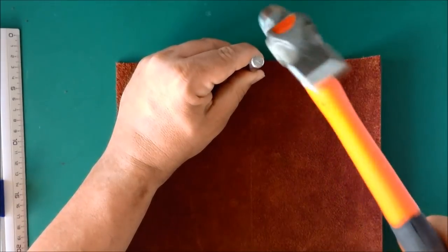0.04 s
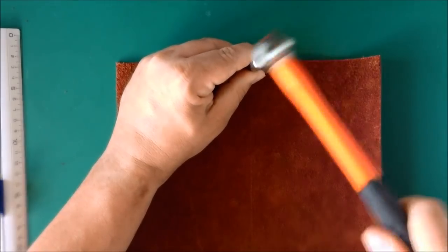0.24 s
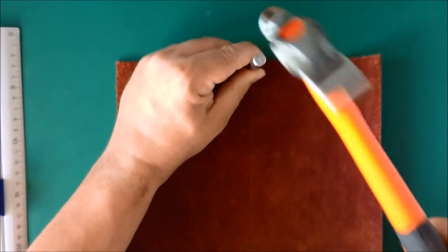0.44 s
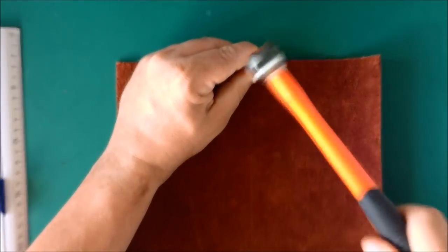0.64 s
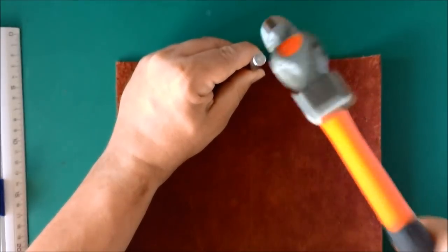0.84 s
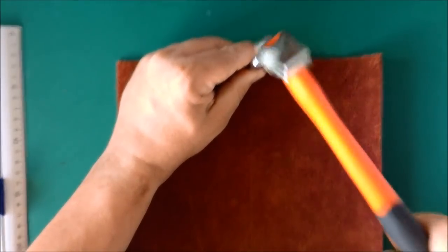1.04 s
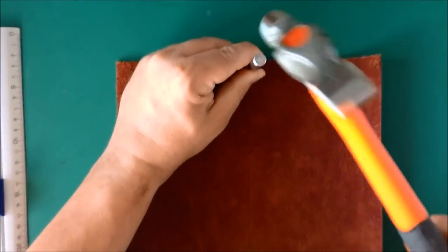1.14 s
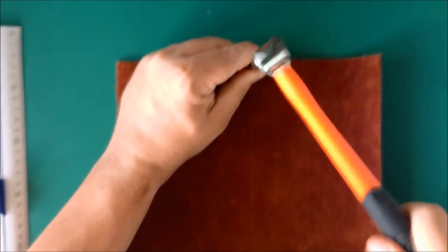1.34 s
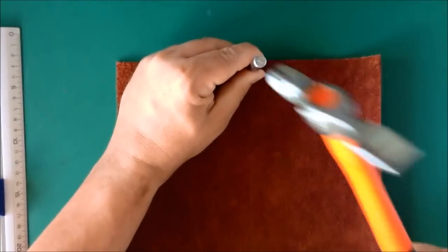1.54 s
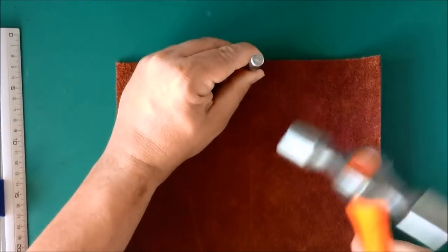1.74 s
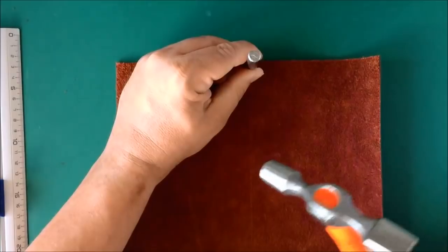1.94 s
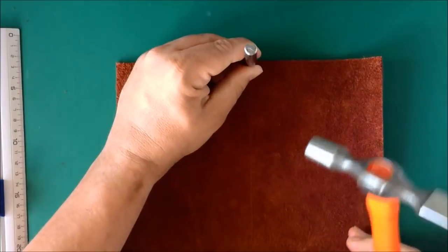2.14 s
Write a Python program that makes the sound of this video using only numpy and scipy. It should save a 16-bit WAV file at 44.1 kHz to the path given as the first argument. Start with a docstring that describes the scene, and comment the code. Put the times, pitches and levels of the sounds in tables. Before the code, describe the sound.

A hammer hits a small steel punch through leather on a workbench, four sharp clacks evenly spaced, each with a low bench thud and faint settling knocks, close microphone in a small room with quiet hiss.

```python
"""In a small room, a hammer drives a small steel hollow punch through leather on a workbench: four even blows.
Each blow is three contacts (touch, full impact, rebound) exciting steel modes, with a gritty crack of noise.
Beneath it the bench top rings as a sum of decaying sines. Noise tails form the room's diffuse decay, the bench
shudder and the lingering tones. Faint soft knocks follow as the tools settle, over quiet hiss and low noise."""
import sys
import numpy as np
from scipy import signal
from scipy.fft import rfft, irfft
from scipy.io import wavfile

SR = 44100
rng = np.random.default_rng(int(sys.argv[2]) if len(sys.argv) > 2 else 0)


def to_wav(s):
    """Save 16-bit WAV."""
    ch = np.atleast_2d(s).T  # columns
    pcm = np.round(np.clip(ch, -1, 1) * 32767)  # PCM
    wavfile.write(sys.argv[1], SR, pcm.astype(np.int16))


N = 97064
TIME = np.arange(N) / SR
FREQS = np.maximum(np.fft.rfftfreq(N, 1 / SR), 1)

# Noise spectra set only relative levels over frequency, since every noise is scaled to rms 1.
# Treble hiss spectrum. Each row: frequency in Hz, relative density in dB per Hz.
HISS_SPECTRUM = [(200, -29), (600, -11), (900, -2), (1300, 2.5), (1800, -2.5), (3000, 0), (4400, -1),
                 (5500, -8.5), (9000, -12.5), (15000, -14.5)]
# Drift of the hiss. Each row: time in seconds, level in dB.
HISS_DRIFT = [(0, -63.5), (.17, -72), (.3, -65.5), (.6, -71.5), (.95, -71.5), (1.3, -73.5), (1.5, -68),
              (1.72, -67.5), (1.92, -70), (2.2, -66)]
# Low room noise spectrum. Each row: frequency in Hz, relative density in dB per Hz.
LOW_SPECTRUM = [(30, -33), (100, -17.5), (190, 1), (300, -3.5), (380, -1), (460, 4.5), (540, -7.5),
                (800, -10.5), (1500, -29)]
# Drift of the low noise. Each row: time in seconds, level in dB.
LOW_DRIFT = [(0, -59.5), (.17, -71.5), (0.282, -58.5), (.62, -67), (.98, -66), (1.299, -66.5), (1.698, -72),
             (1.919, -71.5), (2.2, -67.5)]

# Hammer blows. Each row: touch time in seconds, steel in dB, bench in dB, extra for upper bench modes in dB,
# thump in dB, touch to impact in seconds, touch to rebound in seconds, crack in dB.
HAMMER_BLOWS = [(.3284, 0.5, 0.5, -14.5, -24.5, .0017, 0.0036, -8.5),
                (0.6947, -2.5, 3, 1.9, -36, 0.0015, 0.0031, -7.5),
                (1.0299, -1.5, 2, 1.16, -30.5, .0013, .0034, -7),
                (1.3663, 2, 4, 2.8, -28.5, .0012, .0037, -8)]
# Modes of hammer and punch. Each row: frequency in Hz, level in dB, t60 in seconds.
STEEL_MODES = [(1265.4, -26, 0.053), (1350, -27, 0.039), (1956, -19, 0.032), (2288, -24, 0.068),
               (2712, -19, .025), (3098, -16, .022), (3664, -18, 0.02), (4513, -21, 0.024),
               (5264, -9.5, 0.0085), (6540, -16.5, 0.016), (8160, -17, 0.0055), (9100, -21, 0.01),
               (10750, -24.5, .008), (12080, -26, 0.015), (14500, -31, .007)]
TOUCH_DB, REBOUND_DB = -8.5, -19.5  # relative to the full impact
# Gritty crack of the contact. Each row: frequency in Hz, relative density in dB per Hz.
CRACK_SPECTRUM = [(500, -11), (1200, 3.5), (2800, 4), (5000, -3), (7500, -10.5), (11000, -13),
                  (15000, -22.5)]
CRACK_RISE_S, CRACK_T60_S = 0.00078, 0.017

# Modes of the bench top. Each row: frequency in Hz, level in dB, t60 in seconds.
BENCH_MODES = [(129.4, -32.5, .2), (181, -16, .076), (213.7, -14, .144), (266, 1, .034), (327.7, -14, .142),
               (389.8, -5.5, .075), (471, -21, 0.12), (546.1, -11, .096), (644.8, -12, .071),
               (696.5, -14.5, .069), (740, -16, 0.067), (824.5, -11.5, 0.035)]
UPPER_BENCH_HZ, BENCH_RISE_S = 600, 0.0066
BENCH_LEAD_S = 0.0042  # bench and thump begin this long before the touch
THUMP_HZ, THUMP_T60_S = 45, 0.044
# Shudder of the bench after a blow. Each row: frequency in Hz, relative density in dB per Hz.
SHUDDER_SPECTRUM = [(60, -34.5), (170, -7.5), (300, 0.5), (520, 1.5), (720, -2.5), (950, -8.5), (1400, -16),
                    (3000, -39.5)]
SHUDDER_DB = -9.5  # relative to the bench level of the blow
SHUDDER_RISE_S, SHUDDER_T60_S = 0.0076, 0.07

# Clack returning from all round. Each row: frequency in Hz, relative density in dB per Hz.
WASH_SPECTRUM = [(40, -26), (100, -12.5), (300, 5), (950, 7), (1500, 3.5), (2200, 0.5), (3200, -1),
                 (5000, -5.5), (7000, -17), (10000, -18.5), (15000, -27.5)]
WASH_DB, WASH_T60_S = -24, 0.22  # level relative to the steel of the blow
# Steel tone lingering after each blow, in order. Each row: centre in Hz, width in Hz, level in dB.
LINGER_TONES = [(2880, 620, -31.5), (4370, 190, -36.5), (4300, 900, -38.5), (5470, 370, -39)]
LINGER_T60_S = 0.25
# low after-rumble of the bench frame
RUMBLE_HZ, RUMBLE_WIDTH_HZ, RUMBLE_DB, RUMBLE_T60_S = 213, 220, -45, 0.64

# Soft knocks as the tools settle. Each row: time in seconds, level in dB.
SETTLING_KNOCKS = [(.399, -27.5), (0.454, -36.5), (.515, -36.5), (.553, -50.5), (.881, -33), (.922, -51.5),
                   (1.217, -37.5), (1.259, -47.5), (1.556, -42.5), (1.595, -45.5)]
# Dull tap of a knock. Each row: frequency in Hz, relative density in dB per Hz.
TAP_SPECTRUM = [(100, -13.5), (300, 1.5), (850, -1), (1300, -16), (2500, -37)]
TAP_DB, TAP_T60_S = -10.5, 0.027  # level relative to the knock
KNOCK_RISE_S, KNOCK_BENCH_DB = 0.001, -8.5  # bench part, relative to the knock

# Share of the sound that the room returns. Each row: frequency in Hz, gain in dB.
ROOM_GAIN = [(50, -19.5), (130, -10.5), (250, -10), (450, -14.5), (700, -14.5), (1100, -10), (2000, -12),
             (3200, -12), (5000, -14.5), (7000, -15.5), (10000, -14.5), (15000, -15.5)]
# Ring time of the room. Each row: band centre in Hz, t60 in seconds.
ROOM_DECAY = [(100, 0.22), (250, 0.2), (700, .2), (2000, 0.26), (4500, 0.25), (8000, 0.17), (14000, 0.053)]
ROOM_RISE_S = 0.0076
CLIP_TOP, CUTOFF_HZ = 1.25, 15300


def from_db(db):
    """Level law: decibels to amplitude gain."""
    return 10 ** (np.asarray(db) / 20)


def at_hz(points, hz):
    """Logarithmic pitch: read a table on a log-frequency axis."""
    f, v = np.transpose(points)
    return np.interp(np.log(hz), np.log(f), v)


def since(s):
    """Causality: seconds gone by since s, zero before."""
    return np.maximum(TIME - s, 0)


def dying(t, t60):
    """Exponential damping: a loss of 60 dB in t60."""
    return np.exp(-np.log(1000) * t / t60)


def rising(t, rise):
    """Exponential build-up: a rounded attack with time constant rise."""
    return 1 - np.exp(-t / max(rise, 1e-5))


def noise(gain):
    """Spectral shaping: white noise weighted by a gain per frequency, scaled to rms 1."""
    x = irfft(rfft(rng.standard_normal(N)) * gain, N)
    return x / x.std()


def shaped_noise(spectrum):
    """Spectral density: noise that follows a table in dB per Hz."""
    return noise(from_db(at_hz(spectrum, FREQS)))


def burst(s, spectrum, rise, t60):
    """Modal overlap: crowded resonances swell and die together as noise."""
    t = since(s)
    return shaped_noise(spectrum) * rising(t, rise) * dying(t, t60)


def mode_sum(t, modes):
    """Modal superposition: damped sines, every other one inverted."""
    total = 0
    for k, (hz, db, t60) in enumerate(modes):
        total = total + (-1) ** k * from_db(db) * dying(t, t60) * np.sin(2 * np.pi * hz * t)
    return total


def background(spectrum, level):
    """Stationary noise under slow modulation: a quiet bed whose level drifts."""
    return shaped_noise(spectrum) * from_db(np.interp(TIME, *np.transpose(level)))


def bench(s, upper_db, rise):
    """Driven modal response: the bench top, pushed through the leather, swells and rings in its modes."""
    t = since(s)
    modes = [(hz, db + upper_db * (hz > UPPER_BENCH_HZ), t60) for hz, db, t60 in BENCH_MODES]
    return rising(t, rise) * mode_sum(t, modes)


def thump(s):
    """Damped oscillation: the whole bench dips under the blow."""
    t = since(s)
    return np.sin(2 * np.pi * THUMP_HZ * t) * dying(t, THUMP_T60_S)


def steel(s, impact_s, rebound_s):
    """Impulse excitation: touch, impact and rebound each set the steel modes ringing briefly."""
    body = mode_sum(TIME[:SR // 5], STEEL_MODES)
    contacts = np.zeros(N)
    for lag, db in ((0, TOUCH_DB), (impact_s, 0), (rebound_s, REBOUND_DB)):
        contacts[int(s * SR) + int(lag * SR)] += from_db(db)
    return signal.fftconvolve(contacts, body)[:N]


def crack(s):
    """Frictional noise: the steel faces grate on each other for some milliseconds."""
    return burst(s, CRACK_SPECTRUM, CRACK_RISE_S, CRACK_T60_S)


def shudder(s):
    """Dense modal decay: the bench shudders just after the blow."""
    return burst(s, SHUDDER_SPECTRUM, SHUDDER_RISE_S, SHUDDER_T60_S)


def wash(s):
    """Diffuse reflection: the clack comes back from all round as an even wash."""
    return burst(s, WASH_SPECTRUM, ROOM_RISE_S, WASH_T60_S)


def after_ring(s, hz, width_hz, t60):
    """Resonant selection: a cluster of close resonances around one pitch lingers after a blow."""
    t = since(s)
    resonance = 1 / (1 + (2 * (FREQS - hz) / width_hz) ** 2)
    return noise(resonance) * rising(t, ROOM_RISE_S) * dying(t, t60)


def room(dry):
    """Reverberation: convolution with a diffuse tail in which each band dies at its own rate."""
    centres = np.log([hz for hz, _ in ROOM_DECAY])
    diffuse = rfft(rng.standard_normal(N)) * from_db(at_hz(ROOM_GAIN, FREQS))
    response = 0
    for row, (_, t60) in zip(np.eye(len(centres)), ROOM_DECAY):
        # overlapping triangular bands on the log-frequency axis
        band = irfft(diffuse * np.interp(np.log(FREQS), centres, row), N)
        fade = rising(TIME, ROOM_RISE_S) * dying(TIME, t60)
        response = response + band * fade / np.linalg.norm(fade)
    return signal.fftconvolve(dry, response)[:N]


def knock(s):
    """Light impact: a dull tap of noise that stirs the bench modes."""
    tap = burst(s, TAP_SPECTRUM, CRACK_RISE_S, TAP_T60_S)
    return from_db(TAP_DB) * tap + from_db(KNOCK_BENCH_DB) * bench(s, 0, KNOCK_RISE_S)


def scene():
    """Linear superposition: blows and knocks in the room, with their tails and the background."""
    quiet = background(HISS_SPECTRUM, HISS_DRIFT) + background(LOW_SPECTRUM, LOW_DRIFT)
    dry, tails = np.zeros(N), np.zeros(N)
    for blow, (ring_hz, ring_width_hz, ring_db) in zip(HAMMER_BLOWS, LINGER_TONES):
        s, steel_db, bench_db, upper_db, thump_db, impact_s, rebound_s, crack_db = blow
        dry += from_db(bench_db) * bench(s - BENCH_LEAD_S, upper_db, BENCH_RISE_S)
        dry += from_db(thump_db) * thump(s - BENCH_LEAD_S)
        dry += from_db(steel_db) * steel(s, impact_s, rebound_s)
        dry += from_db(crack_db) * crack(s)
        tails += from_db(SHUDDER_DB + bench_db) * shudder(s)
        tails += from_db(WASH_DB + steel_db) * wash(s)
        tails += from_db(ring_db) * after_ring(s, ring_hz, ring_width_hz, LINGER_T60_S)
        tails += from_db(RUMBLE_DB) * after_ring(s, RUMBLE_HZ, RUMBLE_WIDTH_HZ, RUMBLE_T60_S)
    for s, db in SETTLING_KNOCKS:
        dry += from_db(db) * knock(s)
    return (dry + room(dry) + tails + quiet)[None]


def record(dry):
    """Saturation and band-limiting: the loudest peaks are rounded, the top is cut."""
    rounded = CLIP_TOP * np.tanh(dry / CLIP_TOP)
    # order 10, ripple 0.2 dB, stopband 80 dB down
    lowpass = signal.ellip(10, 0.2, 80, CUTOFF_HZ, fs=SR, output="sos")
    return signal.sosfilt(lowpass, rounded)


dry = scene()
out = record(dry)
to_wav(out)
```